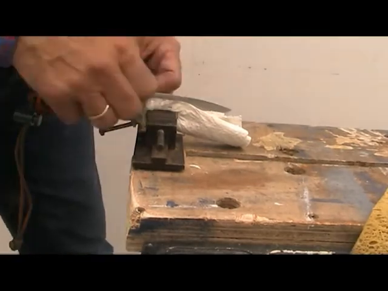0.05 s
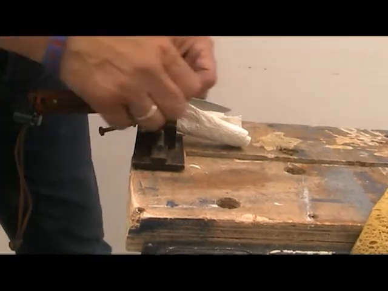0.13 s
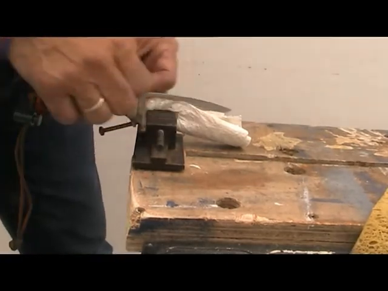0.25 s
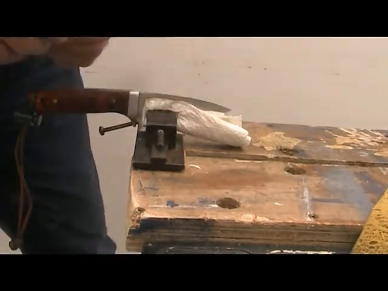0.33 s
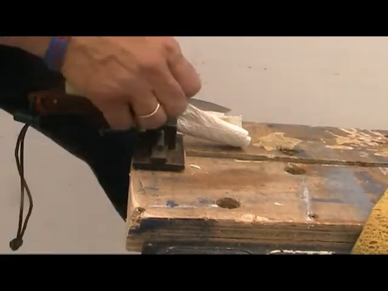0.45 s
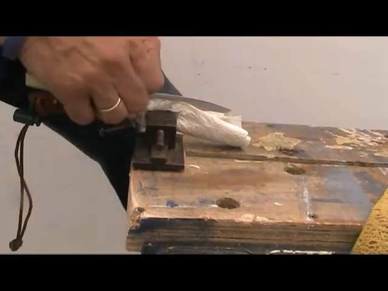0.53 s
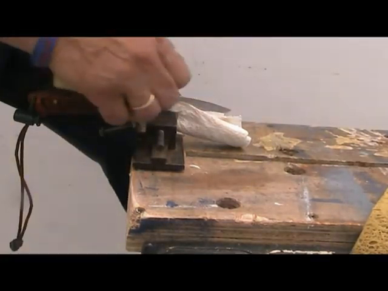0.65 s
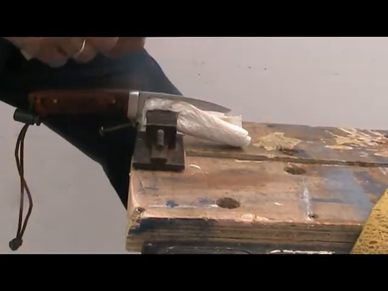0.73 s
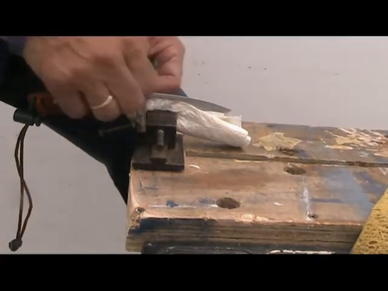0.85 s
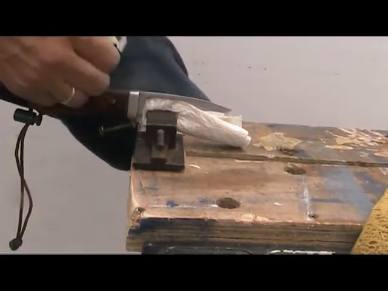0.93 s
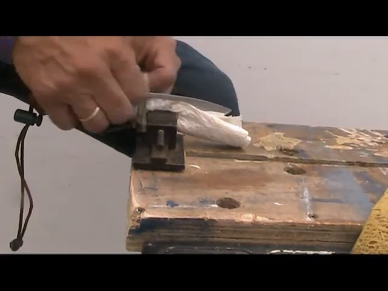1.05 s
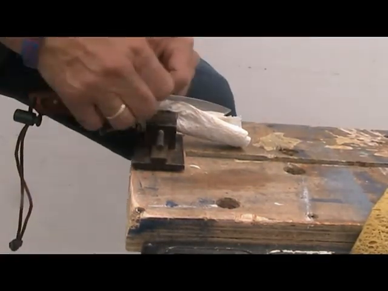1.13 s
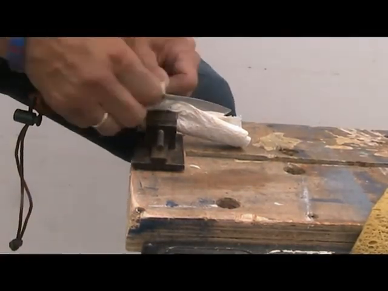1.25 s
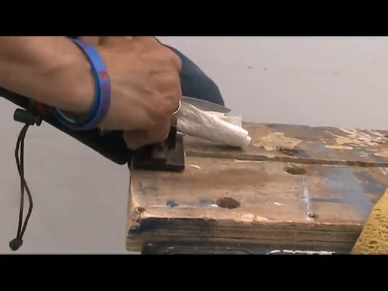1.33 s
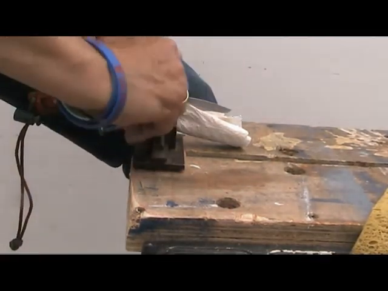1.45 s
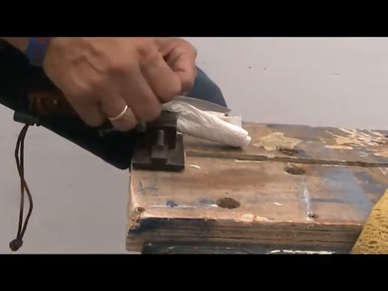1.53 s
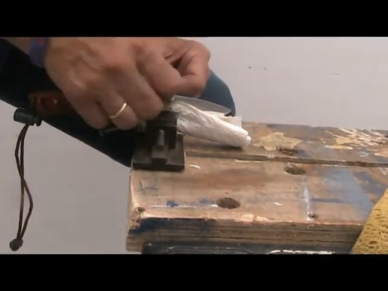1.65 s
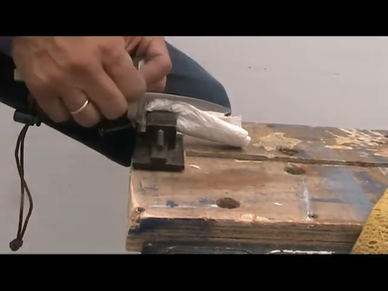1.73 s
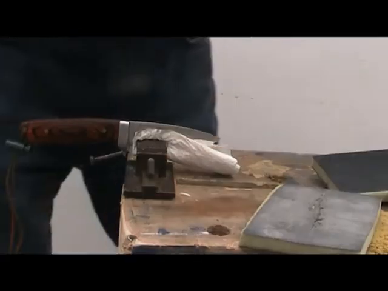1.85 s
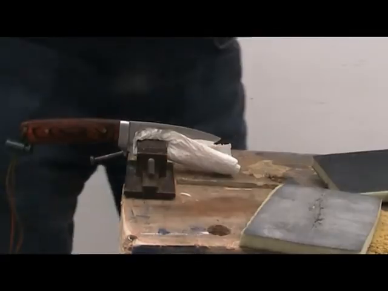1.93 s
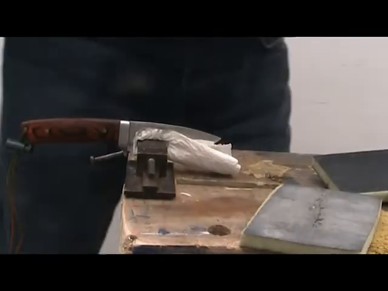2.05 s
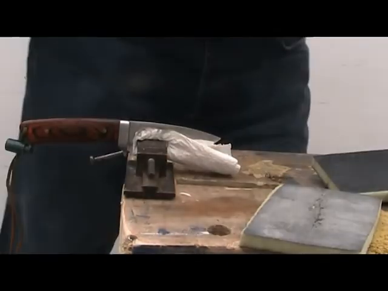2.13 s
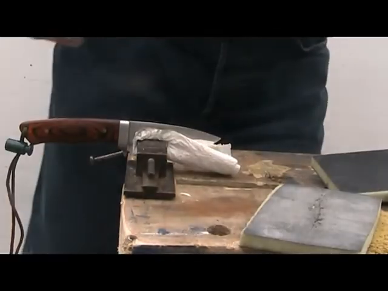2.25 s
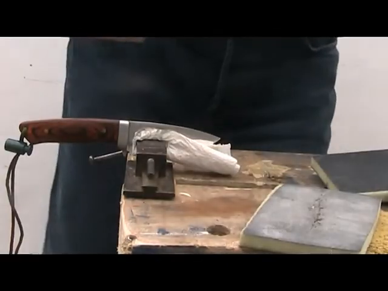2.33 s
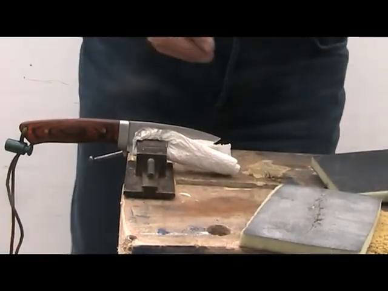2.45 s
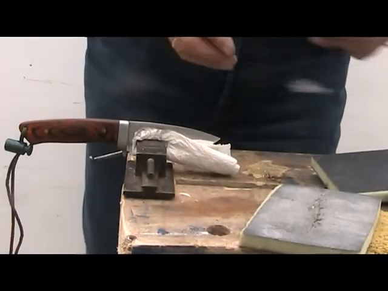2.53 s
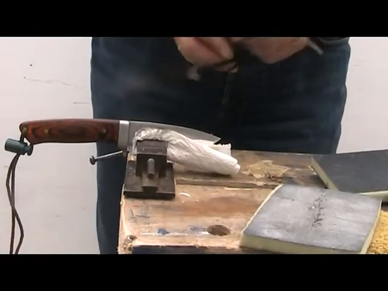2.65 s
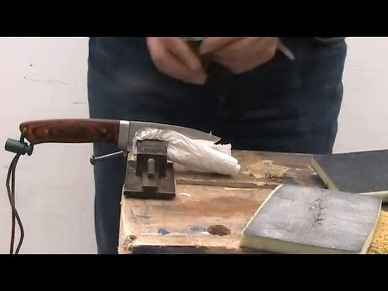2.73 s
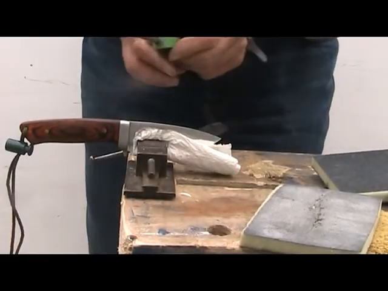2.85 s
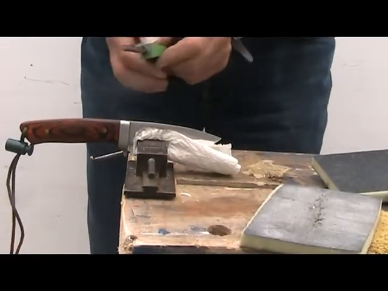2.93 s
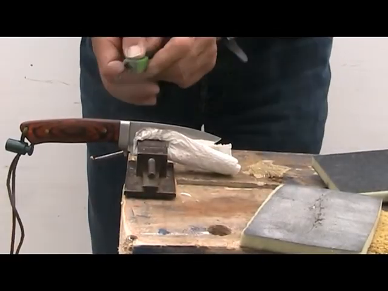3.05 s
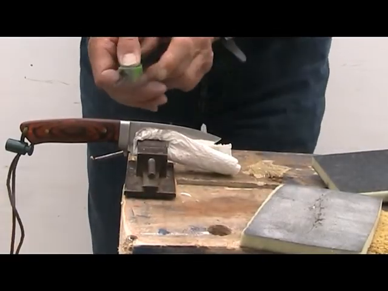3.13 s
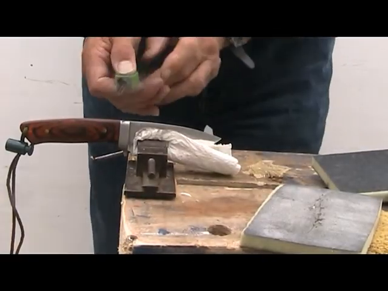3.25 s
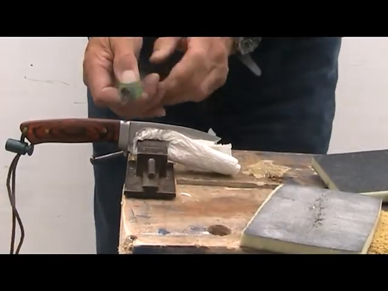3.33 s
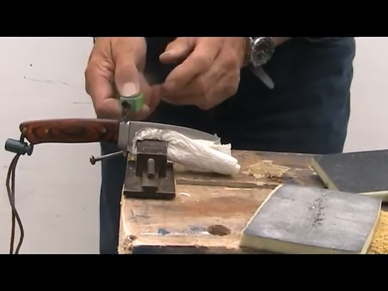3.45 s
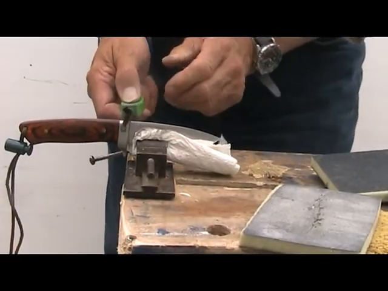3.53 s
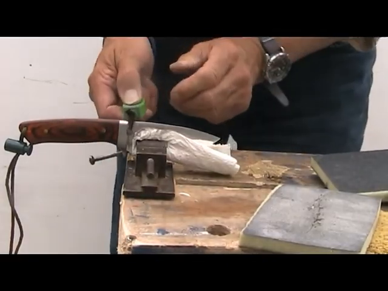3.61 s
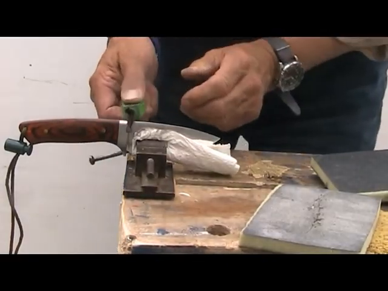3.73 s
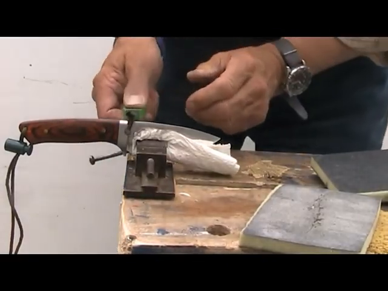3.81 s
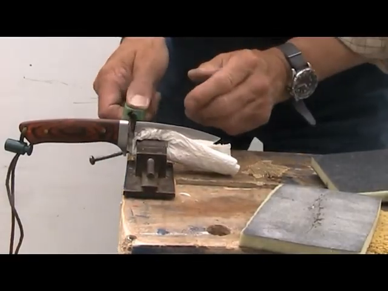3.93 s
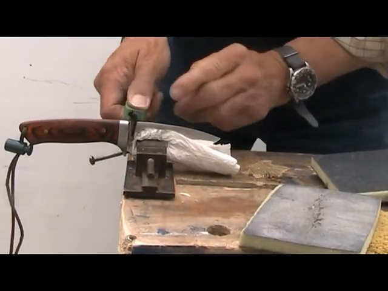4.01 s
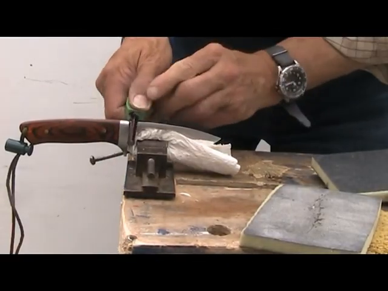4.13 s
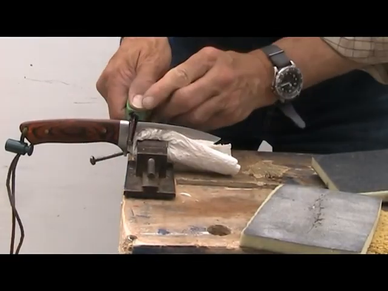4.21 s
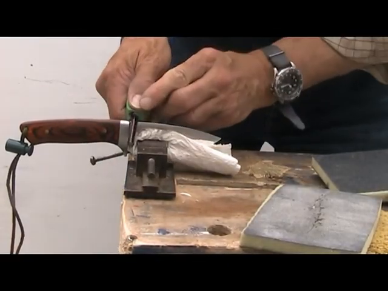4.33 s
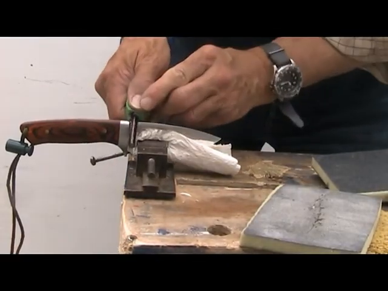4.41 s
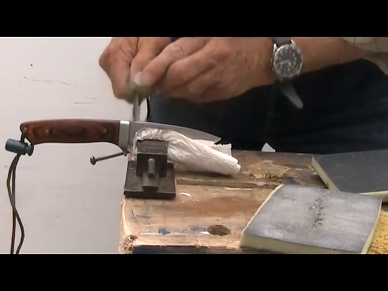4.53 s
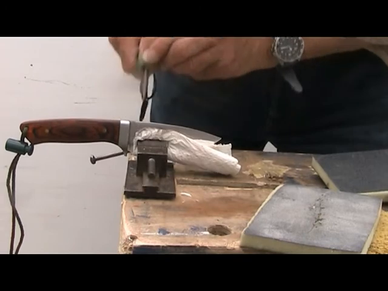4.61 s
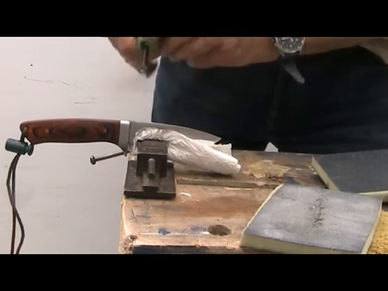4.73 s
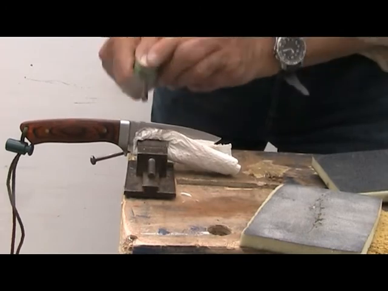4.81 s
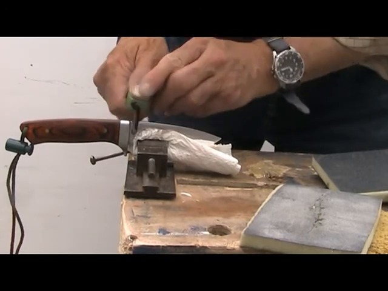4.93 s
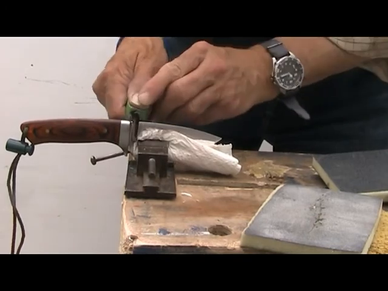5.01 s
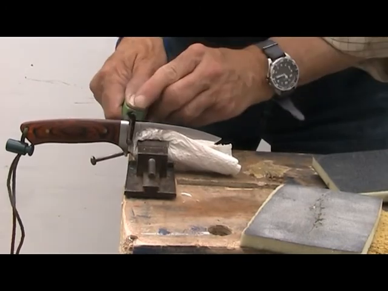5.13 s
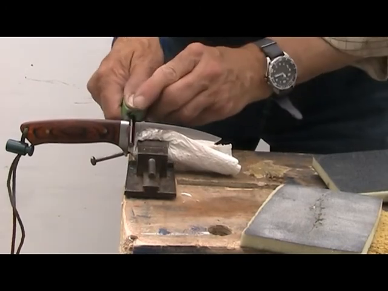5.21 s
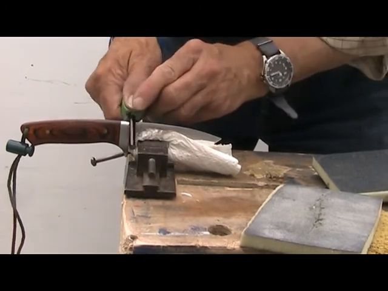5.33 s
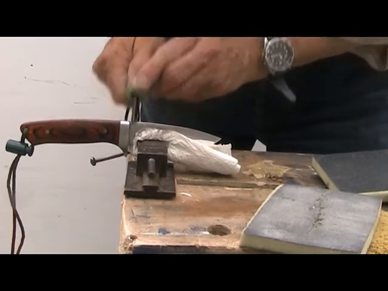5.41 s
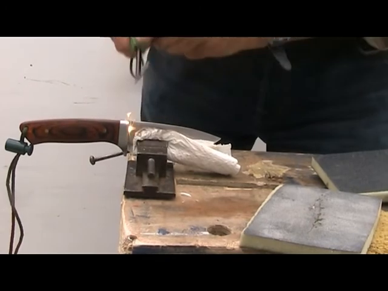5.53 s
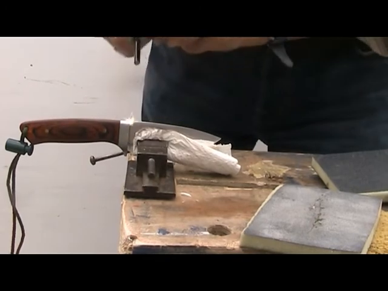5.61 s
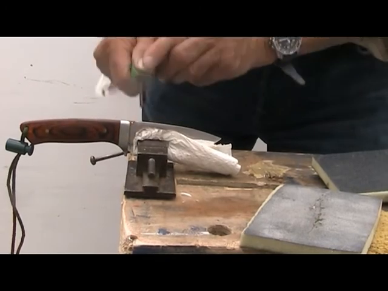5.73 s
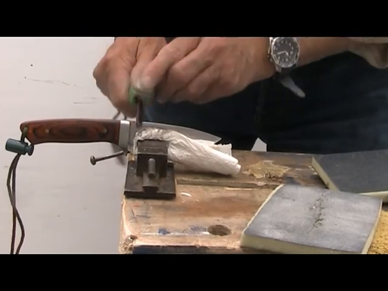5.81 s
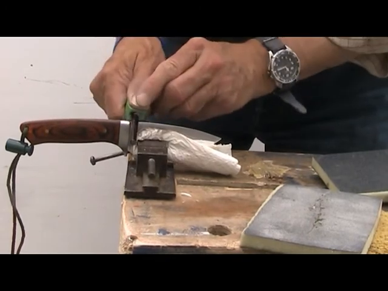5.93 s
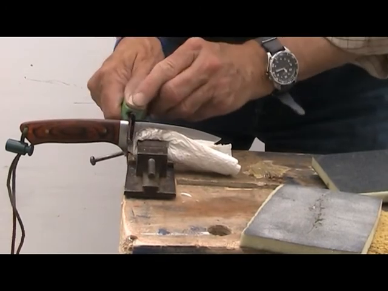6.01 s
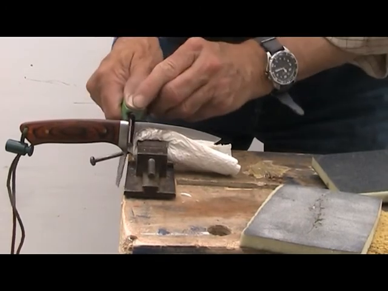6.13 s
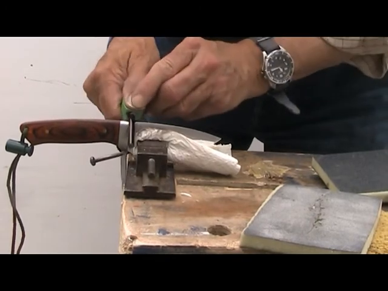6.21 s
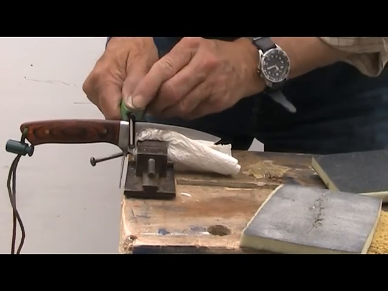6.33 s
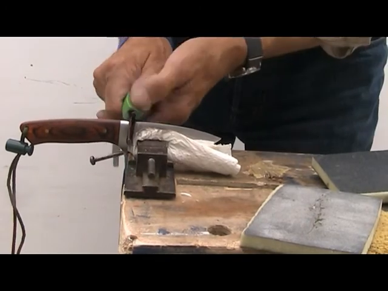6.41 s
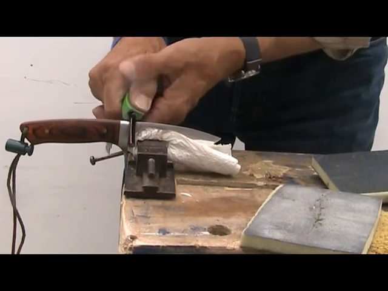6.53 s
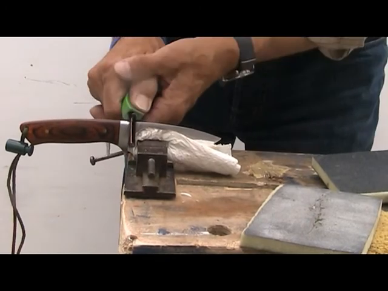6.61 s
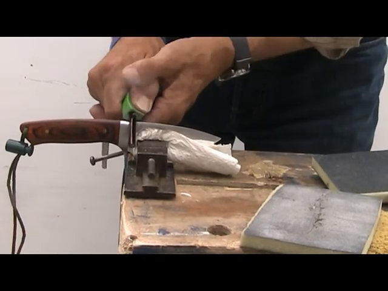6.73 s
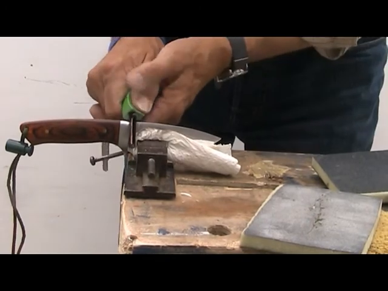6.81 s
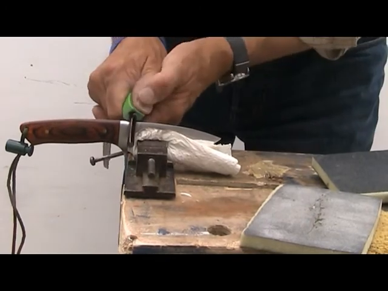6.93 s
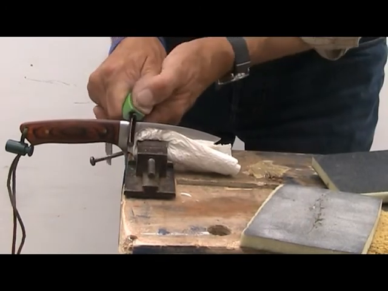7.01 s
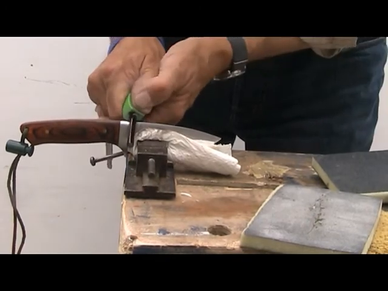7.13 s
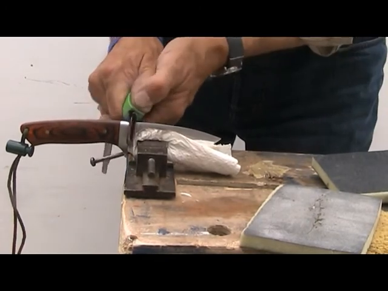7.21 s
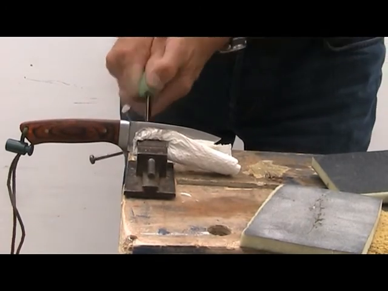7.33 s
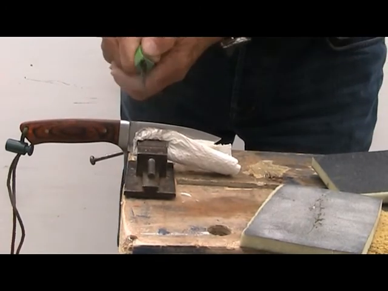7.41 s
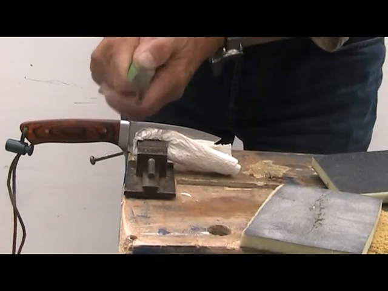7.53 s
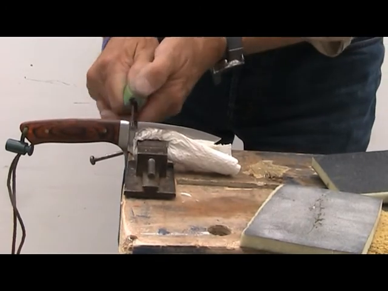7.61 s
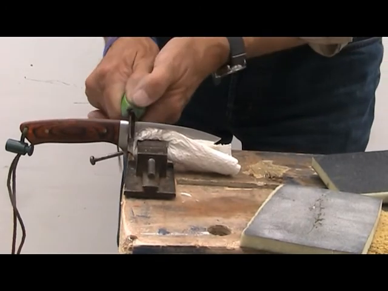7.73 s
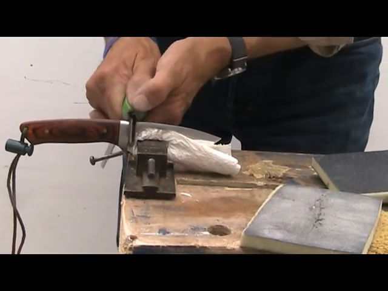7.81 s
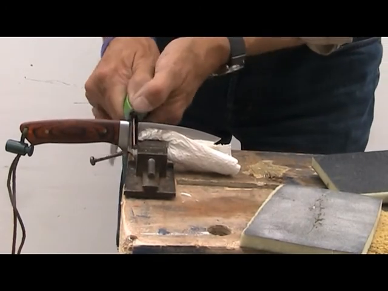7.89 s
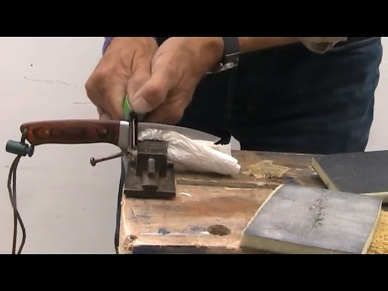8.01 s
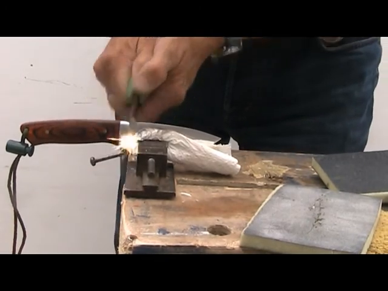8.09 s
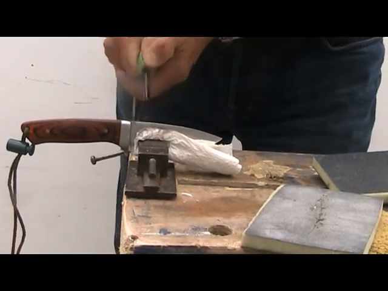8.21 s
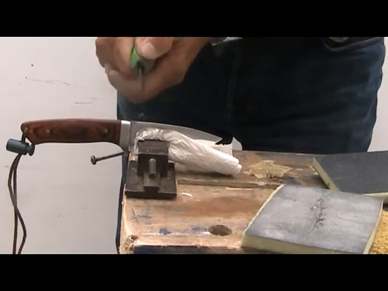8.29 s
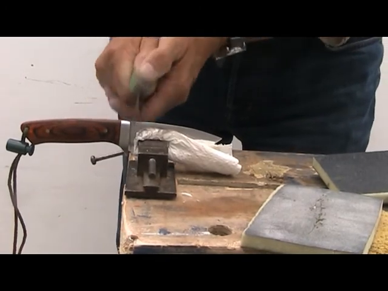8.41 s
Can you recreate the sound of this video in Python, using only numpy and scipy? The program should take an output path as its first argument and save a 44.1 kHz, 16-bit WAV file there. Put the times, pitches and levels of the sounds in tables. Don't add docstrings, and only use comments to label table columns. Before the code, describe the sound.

After a thin fast-forward chatter, objects clack onto a wooden bench, and a rod rasps five times along a clamped blade, jolting the vise.

```python
import sys
import numpy as np
from scipy import signal
from scipy.fft import rfft, irfft, next_fast_len
from scipy.io import wavfile
from scipy.ndimage import map_coordinates

SR = 44100
rng = np.random.default_rng(int(sys.argv[2]) if len(sys.argv) > 2 else 0)


def to_wav(s):
    ch = np.atleast_2d(s).T
    pcm = np.round(np.clip(ch, -1, 1) * 32767)
    wavfile.write(sys.argv[1], SR, pcm.astype(np.int16))


def undo_db(level):
    steps = np.asarray(level, float) / 20
    return 10 ** steps


N = 373072

# (frequency [Hz], level per Hz [dB])
AIR = [(15, -45), (25, -12.5), (133, -4.5), (164, -8), (282, -3), (322, -9), (369, -3), (433, -9.5),
       (482, -8), (826, -12), (1760, -17.5), (5010, -26.5), (9000, -32), (15500, -39.5)]
# (time [s], level [dB])
AIR_LEVEL = [(1.87, -42.5), (2.05, -49.5), (3.6, -50), (4.9, -50.5), (5.91, -51), (6.3, -51), (6.7, -52.5),
             (7.5, -51.5), (8.46, -51.5)]
# (frequency [Hz], likeness [-1 to 1])
AIR_ALIKE = [(60, -0.56), (180, -0.38), (550, 0.014), (1650, -0.6), (4970, -0.52), (15000, -0.26)]
# (time [s], level [dB])
DRONE = [(4.3, -60), (5.55, -44.5), (5.84, -47), (6.1, -51.5), (7.2, -55), (7.32, -41), (7.6, -53.5),
         (7.98, -50), (8.12, -29), (8.46, -56)]
# (time [s], pitch [Hz], level [dB])
FAR_WHINE = [(7.5, 1750, -79), (7.58, 1790, -57), (7.8, 2440, -73), (7.88, 2560, -61), (8.05, 2700, -56),
             (8.15, 2700, -72)]
# (start [s], end [s])
LATE_TICKS = [(2.12, 2.3), (3.2, 3.38), (3.62, 3.74), (4.7, 4.82), (5.1, 5.18), (6.95, 6.98), (3.96, 4.02),
              (4.16, 4.18), (4.32, 4.38), (5.76, 5.78), (6.12, 6.26)]
# (frequency [Hz], time to fall 60 dB [s])
ROOM_DECAY = [(150, 0.75), (500, 0.39), (1400, 0.39), (3700, 0.35), (10000, 0.3)]
# (frequency [Hz], share [0 to 1])
WIDTH = [(150, 0.35), (700, 0.26), (3000, 0.93), (8000, 1), (13000, 0.94)]
# (frequency [Hz], difference [dB])
LEAN = [(60, 2), (180, 2), (550, 2.5), (1650, 2.5), (4970, 1.5), (15000, 1)]

# (frequency [Hz], level per Hz [dB])
FAST_HISS = [(59, -67), (100, -36.5), (712, -22.5), (825, -7.5), (917, -31), (1110, -6), (1260, -18.5),
             (1430, -10.5), (3620, -4), (3850, -4), (4370, -2.5), (4860, 0), (6530, -3.5), (9550, -2.5),
             (15500, -5)]
# (frequency [Hz], likeness [-1 to 1])
FAST_ALIKE = [(60, -0.01), (240, 0.15), (950, -0.29), (3770, -0.42), (15000, -0.11)]
# (pitch [Hz], level [dB])
FAST_LINES = [(834, -70.5), (1104, -77.5), (1500, -78.5), (1930, -76), (3887, -63), (9598, -64)]
# (time [s], level [dB])
FAST_SHUFFLE = [(0.0, -77.5), (.22, -77), (.255, -67), (.3, -76), (.39, -63.5), (.43, -69), (0.5, -60.5),
                (.6, -69.5), (0.998, -82), (1.046, -67.5), (1.18, -87.5), (1.86, -83)]
# (time [s], pitch [Hz], level [dB])
FAST_WHINE = [(.07, 2030, -62), (.14, 2230, -66), (.15, 2230, -90), (.23, 2500, -92), (.24, 2530, -65),
              (.31, 2700, -68), (.32, 2170, -66), (.37, 1940, -54), (.38, 2170, -56.5), (.58, 2190, -63),
              (.7, 2200, -67)]
# (time [s], pitch [Hz], level [dB])
FAST_GLIDE = [(.53, 1930, -56), (.6, 2484, -62), (.7, 3060, -57), (.78, 3090, -55.5), (.83, 3230, -65),
              (.91, 3430, -62), (1.03, 3230, -63), (1.1, 3120, -74)]
# (time [s], peak level [dB], lowest pitch guide [Hz])
FAST_CLICKS = [(0.041, -28.5, 11300), (0.353, -39, 15000), (0.3606, -24, 14700), (0.4505, -33, 11100),
               (0.458, -27, 11800), (0.674, -21.5, 9950), (0.745, -19.5, 10500), (0.9098, -34.5, 8410),
               (1.378, -33, 5700), (1.472, -49.5, 5040), (1.487, -24.5, 11000), (1.652, -25, 11000),
               (1.8075, -25, 10200)]
# (start [s], end [s], level [dB])
FAST_CHATTER = [(0, 0.295, -58.5), (0.382, .72, -56.5), (.77, .93, -56), (0.968, 1.298, -56.5),
                (1.443, 1.477, -56), (1.52, 1.698, -56), (1.73, 1.85, -57)]

# (time [s], half length [s], level [dB])
PUFFS = [(4.172, .03, -59.5), (4.263, 0.02, -58.5), (5.28, 0.0024, -54), (5.475, 0.002, -28),
         (5.42, 0.0023, -22), (5.49, 0.0012, -32), (5.502, 0.0035, -39), (5.597, 0.0017, -33.5),
         (5.605, 0.004, -30), (5.615, 0.0022, -39), (5.677, 0.033, -64), (6.824, 0.018, -52.5),
         (8.44, 0.03, -58)]
# (start [s], rise [s], fall [s], rub level [dB], loose board over rub [dB])
SLIDES = [(1.867, 0.0017, 0.24, -46.5, 10), (2.009, 0.008, 0.03, -27, 5), (2.054, 0.013, 0.034, -34, 17.5),
          (2.305, 0.023, 0.047, -40, -2.5), (2.548, 0.0021, 0.18, -37.5, 4), (2.74, 0.1, 0.005, -47, 4),
          (2.866, 0.0011, 0.055, -24, 12), (3.034, 0.02, 0.13, -24, 1), (3.26, 0.031, 0.064, -49.5, 9.5),
          (4.03, .005, 0.13, -53, 3.5), (5.831, 0.00043, 0.052, -24, 10), (5.885, 0.0031, 0.0045, -28, -14),
          (6.58, 0.027, 0.042, -53.5, 4.5)]
SHEEN_DB = [-2.5, -7.5, -0.5, -3, -5, -4.5, -17.5, -10.5, -4, -6, -30, -23, -7.5]
# (time [s], clack [dB], thud [dB], clack pitch [Hz], thud pitch [Hz])
KNOCKS = [(1.877, -27, -36, 1040, 415), (1.932, -18, -27, 2100, 648), (2.011, -42, -29.5, 1380, 360),
          (2.056, -26, -40, 1880, 1080), (2.065, -14.5, -29, 1072, 292), (2.071, -21, -30.5, 2040, 1066),
          (2.08, -14.5, -29, 1063, 300), (2.092, -20.5, -29, 1137, 1160), (2.55, -25.5, -21.5, 776, 265),
          (2.767, -38.5, -41, 2230, 254), (2.866, -15.5, -25, 1600, 542), (2.8705, -13.5, -22, 2336, 560),
          (3.036, -23.5, -26, 2070, 350), (3.058, -18, -39, 840, 680), (3.105, -19.5, -20.5, 849, 365),
          (3.131, -23.5, -16, 2200, 296), (3.157, -29.5, -23, 2510, 468), (3.195, -39, -37, 890, 304),
          (3.263, -40, -35, 790, 250), (3.283, -41, -22.5, 800, 257), (3.305, -42, -25.5, 800, 250),
          (3.379, -17, -26, 1165, 468)]
# (time [s], clack [dB], thud [dB], clack pitch [Hz], thud pitch [Hz])
JOLTS = [(4.162, -39.5, -43.5, 1450, 545), (4.521, -14, -19, 1660, 616), (4.544, -19.5, -17, 1830, 540),
         (4.997, -9.5, -24.5, 1100, 590), (5.001, -24, -22.5, 950, 1065), (5.03, -18.5, -27.5, 1210, 1120),
         (5.407, -15.5, -12.5, 1400, 554), (5.439, -15, -6.5, 820, 522), (5.469, -19.5, -22, 826, 520),
         (5.832, -14, -35, 1350, 440), (5.845, -18.5, -46, 2241, 550), (5.98, -31, -30.5, 1240, 553),
         (7.294, -16, -11, 910, 489), (7.363, -25, -18, 890, 485), (7.676, -11, -27, 1225, 566),
         (7.677, -14, -34, 2250, 627), (7.716, -22, -30, 2300, 1150), (7.775, -28, -34, 1300, 600),
         (7.679, -34.5, -21, 2750, 1120), (7.69, -20, -26.5, 2120, 627), (8.09, -14.5, -27.5, 1320, 546),
         (8.119, -13, -6, 805, 522.5), (8.13, -12.5, -19.5, 867, 430)]
# (time [s], level [dB])
SNAPS = [(1.9322, -21.5), (2.0575, -27), (2.8665, -13), (2.871, -9), (4.5218, -5), (4.998, -12.5),
         (5.8325, -15), (5.8895, -11.5), (7.2662, -9), (7.676, -12), (8.0885, -0.5)]
# (pitch over the clack's [ratio], level [dB], time to fall 60 dB [s])
CLACK_MODES = [(1, -7, .035), (1.33, -9, .03), (1.9, -11, .025)]
# (frequency [Hz], width [Hz], level [dB])
CLUTTER = [(1740, 1020, -8), (3060, 1900, 2.5), (4650, 4700, -2)]
SHEEN = [(7500, 4880, 16.5), (11800, 6150, -7.5)]
BOARD = [(867, 280, -1), (1100, 146, 6), (1380, 326, 4), (2200, 790, 1.5)]
BENCH = [(254, 13, -6), (299, 15, -3.5), (389, 75, -3.5), (465, 20.5, 3.5), (550, 14, 4.5), (582.5, 17, 5),
         (680, 140, -3)]
HOLLOW = [(250, 21, 2), (300, 32, 3.5), (346, 32, 1), (475, 43, 0), (650, 69, -5), (817, 40, -1.5)]

# (time [s], peak level [dB], pitch [Hz])
TINKS = [(2.326, -38, 7300), (2.339, -42, 6900), (3.381, -40, 5900), (5.98, -36, 6300),
         (3.5573, -37.5, 8200), (3.7701, -23, 7960), (3.8906, -47, 7940), (4.968, -21.5, 8180),
         (7.639, -6.5, 8090), (4.5087, -25, 8000), (5.523, -31, 7600), (5.889, -18, 8090),
         (7.3167, -14, 5900), (8.015, -37, 8200), (8.177, -25, 6200), (4.557, -15.5, 7860),
         (4.615, -27.5, 7500), (4.6314, -32, 7600), (5.4608, -14, 7780), (5.469, -14.5, 8050),
         (5.4989, -16.5, 7750), (5.462, -22, 4700), (5.633, -36.5, 6500), (7.3195, -3.5, 7830),
         (7.359, -18, 7630), (8.1552, -15, 7830), (8.1864, -27, 7600)]
# (time [s], level [dB], middle modes [dB], top modes [dB])
JINGLES = [(2.31, -53, 3, 3), (2.326, -44.5, 13, 2), (2.639, -54, -11, 10), (2.701, -48, -6, 9.5),
           (2.74, -47, -1, 9), (2.866, -25.5, 0, -1), (2.92, -36.5, -6, 3), (4.968, -41, 5, -6),
           (5.61, -58, -10, 2), (5.667, -62, -20, 1), (5.745, -60, -8, 9), (5.837, -41, -6, -3),
           (5.862, -50, 5, -8), (5.889, -36, -10, -8), (6.11, -67, -9, -6), (7.64, -45, 0, -13),
           (7.71, -41.5, 3, -17)]
# (level [dB], time to fall 60 dB [s]), then their pitches [Hz]
STRIKER = [(-4.5, 0.16), (-25, 0.97), (-3, 0.17), (-20.5, 0.43), (-10, 0.21), (-18, 0.2), (-23, 0.25)]
STRIKER_HZ = [4285, 6608, 8118, 10030, 12660, 14310, 14950]

# (start [s], edge bites [s], rod leaves the blade [s])
STROKES = [
    (4.42, 4.458, 4.521),
    (5.335, 5.378, 5.413),
    (6.352, 6.392, 6.428),
    (7.19, 7.217, 7.266),
    (8.01, 8.032, 8.088),
]
# (strength [dB], extra push at the exit [dB], grip on the jaw [dB])
EFFORT = [(-22, 4.5, -2.5), (-12.5, -6.5, -2), (-27, -3, 4), (-18.5, 1.5, 2), (-22, 2.5, 0.5)]
TIP_DB = [-0.5, 1.5, -1.5, 1, 0]
SHADE_DB = [-3, -5.5, -18.5, -3.5, -1]
# (blade, rod tip, vise, jaw) [dB]
TOUCH_DB = [-24, -46, -30.5, -20.5]
BITE_DB = [-8.5, -10.5, -15, -11.5]
EXIT_DB = [-2, -6.5, -14.5, -11]
SHUDDER_DB = [-30, -50, -37, -18]
# (start [s], rise [s], fall [s])
SHUDDER = (5.425, .016, .045)
# (time [s], blade [dB], then rod tip, vise and ping over blade [dB])
BLOWS = [(2.5551, -29.5, 6.5, -18, -4), (3.5554, -30.5, -9.5, -6.5, 16), (3.7691, -21.5, -7, -10.5, 21.5),
         (4.078, -42.5, 1.5, 4.5, 2), (4.5199, -23.5, 17.5, 5, 27), (4.9663, -13.5, -6, -11.5, 18),
         (5.8866, -17.5, -7.5, -6, 20.5), (6.4208, -55, -6, -7, -6), (7.2638, -13.5, 16, -3.5, 13),
         (7.6368, -11.5, -2, -9.5, 17.5), (8.0873, -3.5, 3.5, -12.5, 3)]
# (frequency [Hz], width [Hz], level [dB])
BLADE = [(2750, 90, 5), (3000, 480, -5), (3410, 200, 2), (3763, 81, 7), (4200, 1200, -6), (4596, 120, -2),
         (5960, 110, 2.5), (6200, 90, 3), (6320, 390, -1.5)]
PING = [(3590, 110, 18), (3725, 130, 11), (4880, 200, 5.5)]
ROD = [(7000, 140, -16.5), (7940, 350, 6), (8295, 140, 3.5), (8780, 160, -5), (9340, 800, -2),
       (9750, 190, 1)]
VISE = [(774, 540, -6.5), (1160, 58, 5.5), (1360, 71, 9.5), (1590, 240, 4.5), (1800, 250, 2),
        (2280, 170, -0.5)]
JAW = [(429, 65, -4.5), (566, 24, 3.5), (680, 110, -9)]


def unit(x):
    return x / np.sqrt(np.mean(x ** 2) + 1e-20)


def along(points, hz):
    f, v = np.transpose(points)
    return np.interp(np.log(hz + 1), np.log(f + 1), v)


def curves(rows, outside=-120):
    s, *cols = np.transpose(rows)
    return np.array([np.interp(np.arange(N) / SR, s, c, outside, outside) for c in cols])


def wobble(rate):
    knots = rng.standard_normal(int(N * rate / SR) + 4)
    return map_coordinates(knots, [np.arange(N) * rate / SR])


def tone(hz):
    return np.sin(2 * np.pi * np.cumsum(hz + np.zeros(N)) / SR)


def filtered(x, response):
    m = next_fast_len(N + SR // 2)
    return irfft(rfft(x, m) * response(np.fft.rfftfreq(m, 1 / SR)), m)[..., :N]


def body(x, modes, order=2):
    low_hz = modes[0][0] - modes[0][1]
    high_hz = modes[-1][0] + modes[-1][1]

    def response(f):
        skirt = (1j * f / (low_hz + 1j * f) * high_hz / (high_hz + 1j * f)) ** order
        ring = 0
        for k, (hz, width, db) in enumerate(modes):
            ring = ring + (-1) ** k * undo_db(db) * 1j * f * width / (hz * hz - f * f + 1j * f * width)
        ring = skirt * ring
        return ring / np.sqrt(np.mean(abs(ring) ** 2))

    return filtered(x, response)


def narrow(hz, width_hz):
    slow = wobble(width_hz) + 1j * wobble(width_hz)
    return np.real(slow * np.exp(2j * np.pi * np.cumsum(hz + np.zeros(N)) / SR))


def rush(spectrum, alike):
    def response(hz):
        turn = np.arccos(np.clip(along(alike, hz), -1, 1)) / 2
        return undo_db(along(spectrum, hz)) * [np.cos(turn), np.sin(turn)]

    mid, side = filtered(rng.standard_normal((2, N)), response)
    return unit(np.array([mid + side, mid - side]))


def grit(tables, coarse_db, lumpy_db):
    level = sum(undo_db(curves(rows)) for rows in tables)
    grain = undo_db(coarse_db * wobble(500) + lumpy_db * wobble(60))
    return level * unit(rng.standard_normal(level.shape) * grain)


def bursts(contact, rise=0.00018):
    t = np.arange(2000) / SR
    push = rng.standard_normal((len(contact), len(t)))
    push = push * undo_db(-60 * t / np.c_[contact]) * (1 - np.exp(-t / rise))
    return push / np.linalg.norm(push, axis=1, keepdims=True)


def swell(s, rise, fall, db):
    return [(s, *(db - 7.5)), (s + rise, *db), (s + rise + fall, *(db - 16.5))]


def background():
    air = undo_db(curves(AIR_LEVEL)[0] + 6.0 + 0.41 * wobble(3.1)) * rush(AIR, AIR_ALIKE)
    whine_hz, whine_db = curves(FAR_WHINE)
    whine = undo_db(whine_db) * narrow(whine_hz, 360)
    drone = undo_db(curves(DRONE)[0] - 3.5) * narrow(146, 11)
    ticks = np.zeros(N)
    at = np.arange(1.8876, N / SR, .04)
    at = at + .023 * sum((at > start) * (at < end) for start, end in LATE_TICKS)
    tick_db = -34 + rng.standard_normal(len(at)) - 7 * (abs(at - 6.85) < .5)
    ticks[(at * SR).astype(int)] = undo_db(tick_db)
    return air + whine + drone + body(ticks, [(3490, 370, 2), (4430, 350, 5)])


def workshop(x, gap_s=.004, count=24):
    out = np.zeros((2, N + 2 * SR))
    size = N // count + 1
    for k in range(count):
        hz, t, z = signal.stft(rng.standard_normal((3, SR * 3 // 4)), SR, nperseg=256)
        z = z[0] + along(WIDTH, hz)[:, None] * z[1:]
        z = z * undo_db(-60 * t / along(ROOM_DECAY, hz)[:, None])
        tail = signal.istft(z, SR, nperseg=256)[1]
        tail = tail / np.linalg.norm(tail[0])
        wet = signal.fftconvolve(x[None, k * size:(k + 1) * size], tail, axes=1)
        out[:, k * size + int(gap_s * SR):][:, :wet.shape[1]] += wet
    return out[:, :N]


def fast_clicks():
    out = np.zeros(N)
    t = np.arange(-600, 600) / SR
    for s, db, hz in FAST_CLICKS:
        band = signal.butter(2, [0.81 * hz, min(2.0 * hz, SR / 2.5)], "band", fs=SR, output="sos")
        puff = rng.standard_normal(len(t)) * np.exp(-abs(t) / 0.0029)
        out[round(s * SR) - 560:][:len(t)] += undo_db(db - 3.5) * signal.sosfilt(band, puff)
    return out


def fast_shot():
    clock = np.arange(N) / SR
    running = sum(undo_db(db) * (clock > start) * (clock < end) for start, end, db in FAST_CHATTER)
    gate = np.sin(np.pi * 190 * clock) ** 8 * undo_db(2.8 * wobble(140))
    chatter = body(gate * rng.standard_normal(N), [(4930, 160, 0.9), (5520, 330, -2.5)])
    out = running * unit(chatter)

    shuffle_db, = curves(FAST_SHUFFLE)
    shuffle = body(rng.standard_normal(N) * undo_db(1.8 * wobble(31.3)),
                   [(464, 104, -1.0), (650, 400, -1.5), (860, 260, 3.5), (1450, 14, 9.0)])
    out = out + undo_db(shuffle_db + 3.5) * unit(shuffle)

    for hz, db in FAST_LINES:
        phase = 2 * np.pi * hz * clock + 0.15 * wobble(0.016 * hz)
        out = out + undo_db(db + 2.5 + 0.8 * wobble(24.6)) * np.sin(phase)
    out = out + undo_db(-61.5) * narrow(11700, 900) + undo_db(-60.5) * narrow(14400, 700)

    whine_hz, whine_db = curves(FAST_WHINE)
    out = out + undo_db(whine_db - 0.5 + 1.3 * wobble(18.0)) * narrow(whine_hz, 130)
    glide_hz, glide_db = curves(FAST_GLIDE)
    glide = narrow(glide_hz, 130) + 0.29 * narrow(.53 * glide_hz, 68)
    out = out + undo_db(glide_db - 1.5 + 1.8 * wobble(25)) * glide

    hiss = undo_db(-45.5 + 0.19 * (shuffle_db + 74.5)) * rush(FAST_HISS, FAST_ALIKE)
    return (out + fast_clicks() + hiss) * (clock < 1.867)


def puffs():
    clock = np.arange(N) / SR
    level = sum(undo_db(db) * np.exp(-((clock - s) / length) ** 2) for s, length, db in PUFFS)
    return body(level * rng.standard_normal(N), [(3840, 5000, -1.0), (7500, 1870, 5), (12100, 4500, 2.5)])


def bench():
    slides = []
    for (s, rise, fall, db, board_db), sheen_db in zip(SLIDES, SHEEN_DB):
        slides.append(swell(s, rise, fall, db + np.array([0, sheen_db, board_db, 0])))
    force = undo_db(-5.0) * grit(slides, coarse_db=1.0, lumpy_db=4.0)
    rings = np.zeros(N + SR)
    t = np.arange(4000) / SR
    for s, clack_db, thud_db, clack_hz, thud_hz in KNOCKS + JOLTS:
        i = round(s * SR)
        board, low, clack = bursts([.05, .03, 0.051], rise=0.0009)
        force[2:, i:][:, :2000] += undo_db(np.c_[[clack_db + 13, thud_db + 17]]) * [board, low]
        edges = [clack_hz / 1.324, clack_hz * 1.324]
        band = signal.butter(3, edges, "band", fs=SR, output="sos")
        rings[i:][:2000] += undo_db(clack_db + 28.5) * signal.sosfilt(band, clack)
        for ratio, db, t60 in CLACK_MODES:
            mode = undo_db(clack_db + db - 60 * t / t60) * np.sin(2 * np.pi * ratio * clack_hz * t)
            rings[i:][:len(t)] += mode * (1 - np.exp(-t / .0006))
        thud = undo_db(thud_db - 3.0 - 60 * t / 0.061) * np.sin(2 * np.pi * thud_hz * t)
        rings[i:][:len(t)] += thud * (1 - np.exp(-t / 0.0016))
    for s, db in SNAPS:
        force[0, round(s * SR)] += undo_db(db + 5.5)
    hollow = (np.arange(N) > 3.02 * SR) * (np.arange(N) < 3.36 * SR)
    pushes = *force[:3], force[3] * (1 - hollow), force[3] * hollow * undo_db(-2)
    bodies = CLUTTER, SHEEN, BOARD, BENCH, HOLLOW
    return sum(body(push, modes) for push, modes in zip(pushes, bodies)) + rings[:N]


def tinks():
    out = np.zeros(N + SR)
    t = np.arange(600) / SR
    for s, db, hz in TINKS:
        waver = .09 * rng.standard_normal(len(t)).cumsum()
        ring = np.sin(2 * np.pi * hz * t + waver) + 0.19 * np.sin(2 * np.pi * 1.13 * hz * t + waver)
        level = undo_db(db + 8.5 - 60 * t / 0.0079) * (1 - np.exp(-t / 0.00088))
        out[round(s * SR):][:len(t)] += level * ring
    return out[:N]


def striker():
    out = np.zeros(N + SR)
    t = np.arange(SR // 2) / SR
    for s, db, middle_db, top_db in JINGLES:
        lift = [0, 0, middle_db, middle_db / 2, top_db, top_db, top_db]
        ring = 0
        for hz, (level, t60), extra in zip(STRIKER_HZ, STRIKER, lift):
            mode_db = level + extra + 1.5 * np.tanh(rng.normal())
            ring = ring + undo_db(mode_db - 60 * t / t60) * np.sin(2 * np.pi * hz * t)
        out[round(s * SR):][:len(t)] += undo_db(db) * ring * (1 - np.exp(-t / 0.00088))
    return out[:N] * undo_db(3.0 * wobble(45))


def strokes():
    out = [swell(*SHUDDER, np.array(SHUDDER_DB))]
    for (start, bite, end), (db, push_db, grip_db), tip_db in zip(STROKES, EFFORT, TIP_DB):
        db = db + np.array([0, 0.099, 0.78, 1]) * grip_db + [0, tip_db, 0, 0]
        touch, biting, leaving = db + TOUCH_DB, db + BITE_DB, db + push_db + EXIT_DB
        out.append([(start, *touch), (bite, *biting), (end, *leaving)])
    return out


def blows():
    force, taps, cracks = np.zeros((4, N)), np.zeros(N), np.zeros(N)
    for s, db, tip_db, vise_db, ping_db in BLOWS:
        i = round(s * SR)
        taps[i + 70] = undo_db(db + ping_db)
        cracks[i + 70] = undo_db(db + tip_db + 6)
        push_db = db + np.c_[[15, tip_db + 9, vise_db + 19, vise_db + 19.5]]
        force[:, i + 60:][:, :2000] += undo_db(push_db) * bursts([0.0053, 0.0071, 0.022, 0.054])
    return force, taps, cracks


def mode_gap(f):
    gap_hz, width_hz = 5150, 1300
    stiff = gap_hz ** 2 - f * f
    return (stiff + 1j * f * width_hz * undo_db(-4)) / (stiff + 1j * f * width_hz)


def knife():
    grinding = strokes()
    blade, tip, vise, jaw = undo_db(-0.5) * grit(grinding, coarse_db=3.5, lumpy_db=1.8)
    note_hz = sum(curves([(start, 8700), (end, 10300)], 0)[0] for start, _, end in STROKES)
    climb = undo_db(6) * filtered(tip, lambda f: 1 / (1 + 1j * f / 400)) * tone(note_hz)
    hum = np.sin(2 * np.pi * 583 * np.arange(N) / SR + .6 * wobble(30))
    hum = hum * undo_db(-3 + 1.5 * wobble(40)) * sum(undo_db(curves(rows)[3]) for rows in grinding[1:])
    blade, tip = filtered(np.array([blade, tip]), mode_gap)
    sparks = undo_db(-10.0) * body(tip, [(11460, 3300, 0)])

    hits, taps, cracks = blows()
    ground = blade + 0.57 * hits[0]
    blade, tip, vise, wood = blade + hits[0], tip + hits[1], vise + hits[2], hits[3]
    rod = body(cracks, [(8430, 1200, 0)], order=5) + body(tip, ROD) + climb
    steel = body(blade, BLADE, order=4)
    ping = body(taps, PING, order=4)
    iron = body(vise, VISE) + body(wood, BENCH) + undo_db(-3) * body(jaw, JAW) + hum
    legs = body(jaw + 0.93 * wood, [(107.6, 41.0, -12.5), (143.4, 29, 0.0), (326, 14, -1.5)])
    rest = iron + undo_db(-7.5) * legs + sparks

    broad = body(ground, [(3420, 1100, -5.0), (5570, 1100, -11)], order=4)
    broad = broad + body(tip, [(7320, 4500, 0)], order=6)
    clock = np.arange(N) / SR - .003
    shade_db = sum(db * (clock > start) * (clock < end) for (start, _, end), db in zip(STROKES, SHADE_DB))
    all_round = undo_db(-9.5) * steel + undo_db(-15.0) * rod + undo_db(1.5) * broad + undo_db(-4.0) * ping + rest
    return steel + rod + ping + rest, undo_db(shade_db) * all_round


def scene():
    near, all_round = knife()
    rest, ring, touch = bench() + puffs(), striker(), tinks()
    echo = workshop(all_round + rest + 0.55 * ring + 0.28 * touch)
    return near + rest + ring + touch + undo_db(-1) * echo + background() + fast_shot()


def low_pass(x):
    return signal.sosfilt(signal.butter(12, 15670, fs=SR, output="sos"), x)


def record(dry):
    def ports(hz):
        return undo_db(along(LEAN, hz) / 2 * np.c_[[1, -1]]) * (hz < 15700)

    return low_pass(np.clip(filtered(dry, ports), -1, 1))


dry = scene()
out = record(dry)
to_wav(out)
```